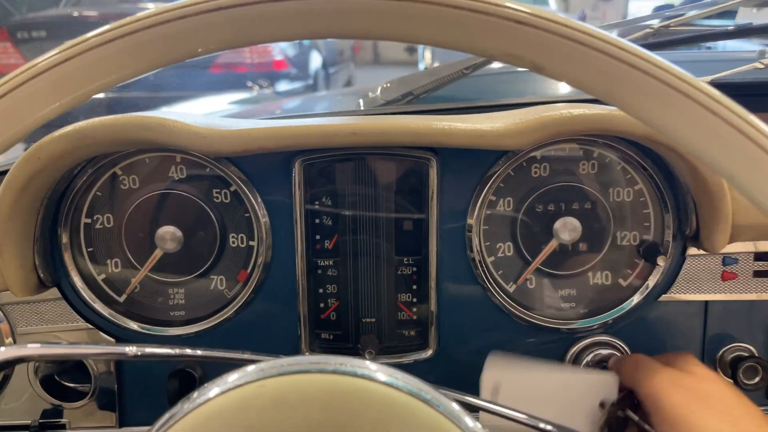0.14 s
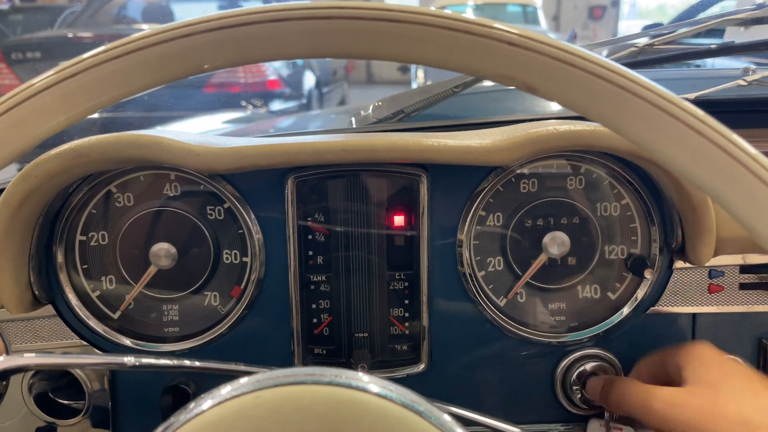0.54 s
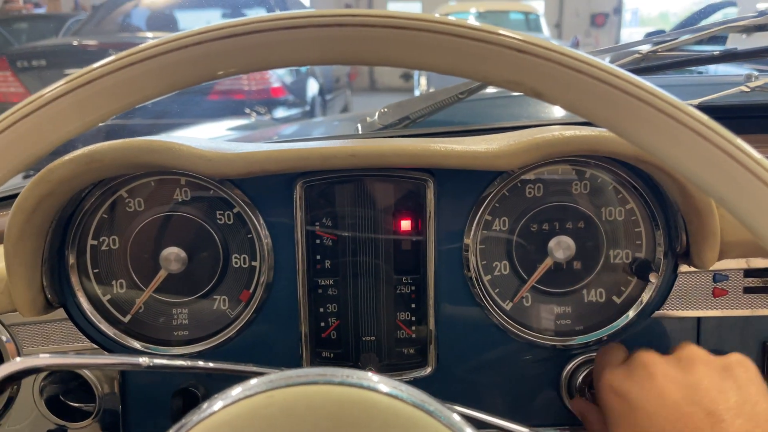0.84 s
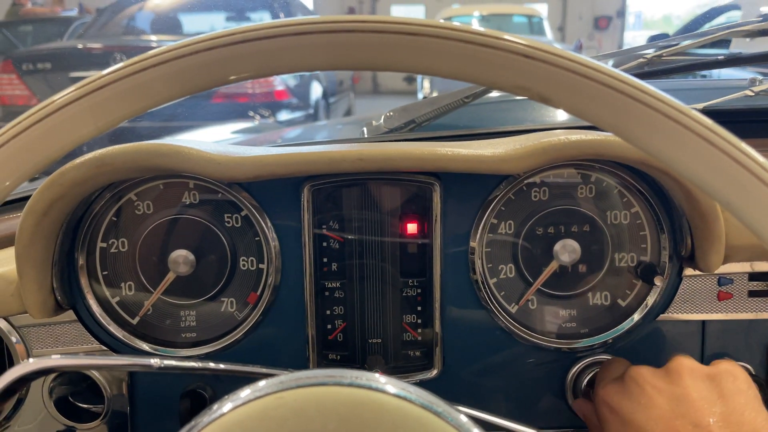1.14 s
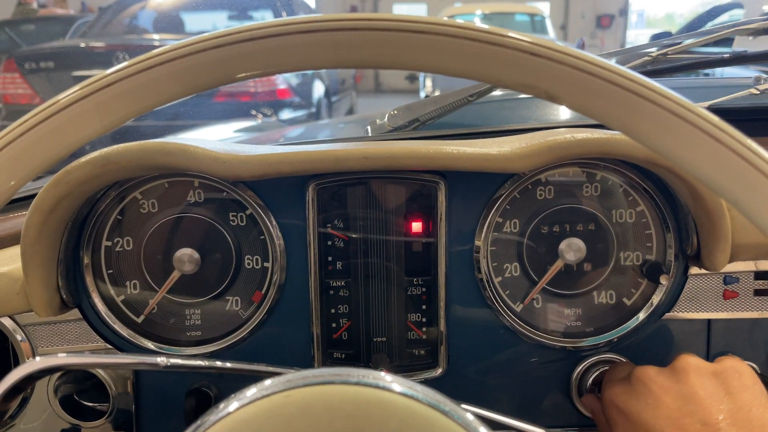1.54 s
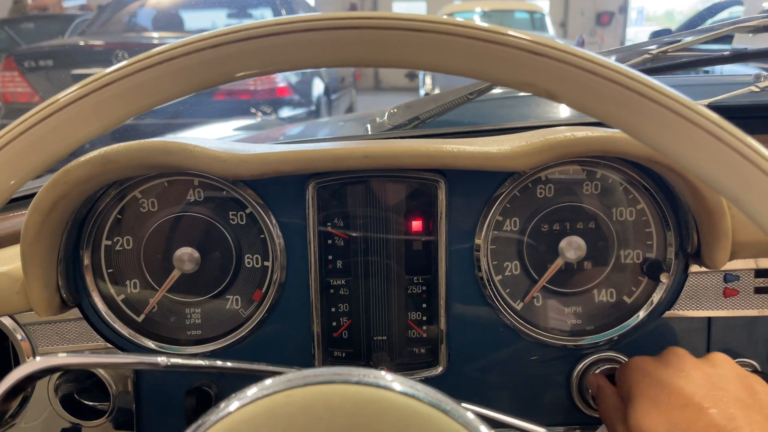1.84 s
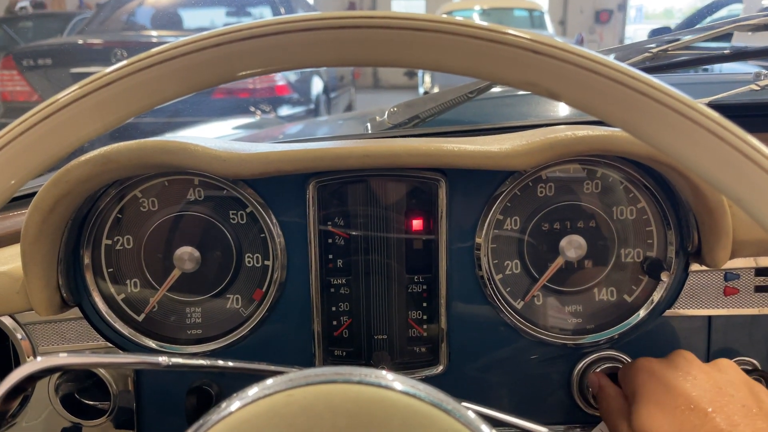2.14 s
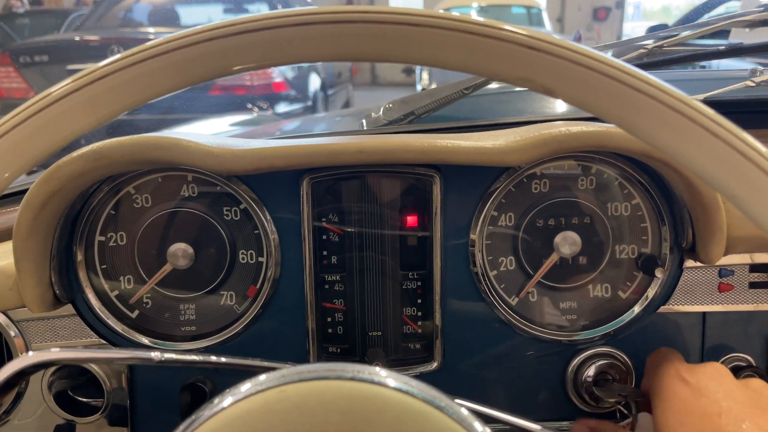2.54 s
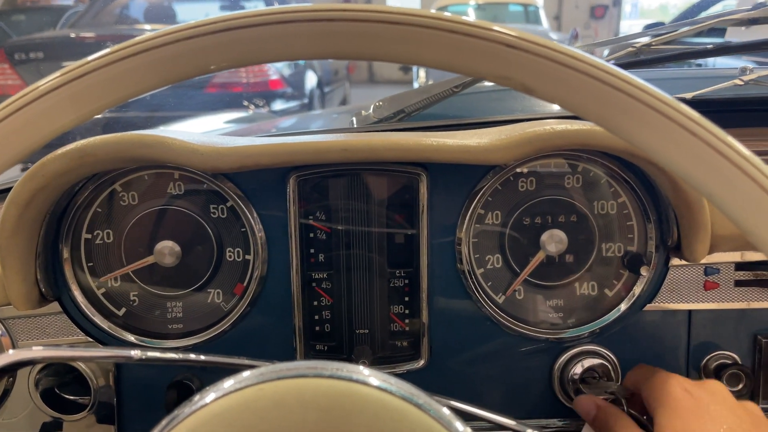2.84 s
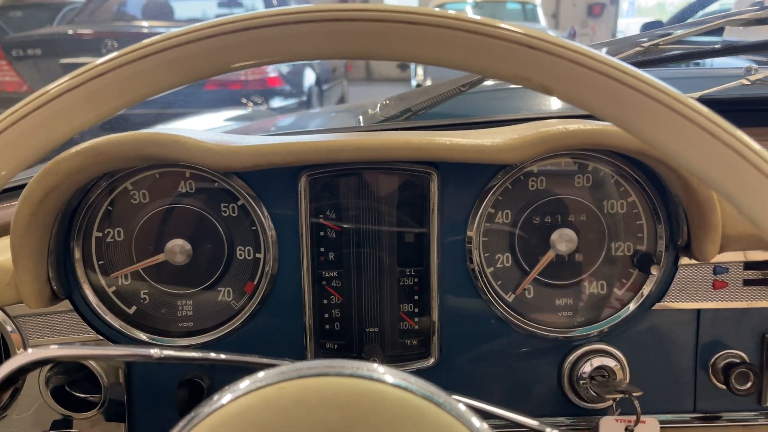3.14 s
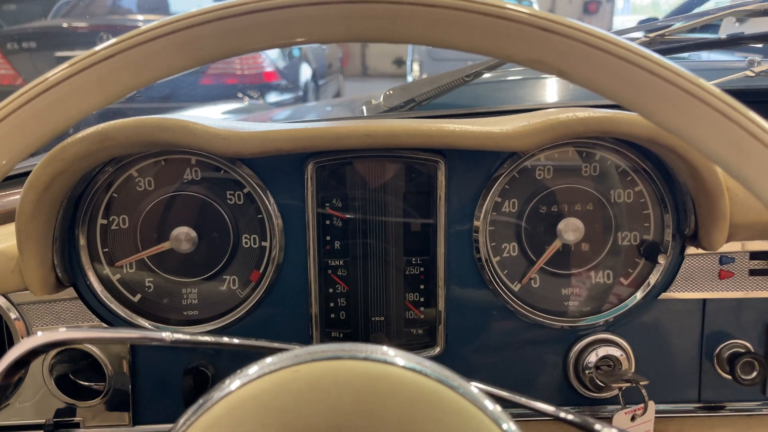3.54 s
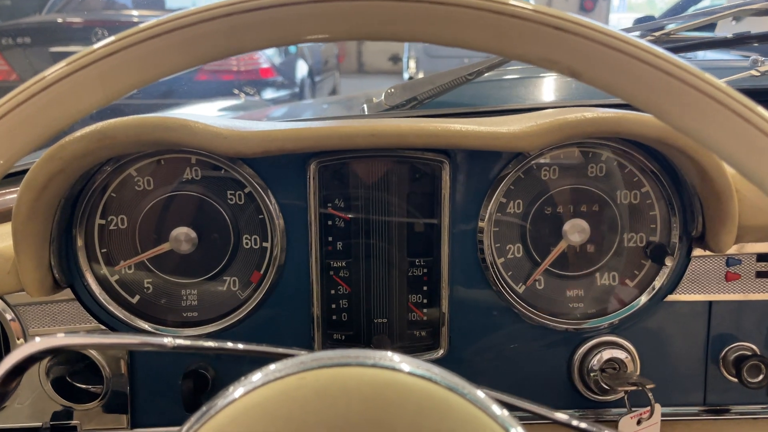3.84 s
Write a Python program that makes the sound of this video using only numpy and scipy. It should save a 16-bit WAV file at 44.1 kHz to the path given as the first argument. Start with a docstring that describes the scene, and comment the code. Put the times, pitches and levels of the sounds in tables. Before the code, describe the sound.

An old car engine is started, heard close inside the cabin in stereo, over faint hall air and distant low rumble. Keys jingle and click from 0.2 to 1 s; a very faint thin whine lasts until 1.9 s. The starter slams in and grinds, groaning. From 2.2 s the engine catches unevenly, thumps at 2.4 and 2.6, climbs to a booming rumble with soft clatter, easing slightly after 3.3 s. Keys clink near 3.2-3.3.

```python
"""Inside an old car in a hall: air noise and low traffic rumble (shaped noise) run throughout.
From 0.19 s the key ring jingles (decaying modes and lock knocks); from 0.92 to 1.88 s a fuel pump whines (narrow noise).
The starter scrapes in, slams home, grinds (noise, random tooth hits, resonances) and groans over compressions.
At 2.17 s the six-cylinder engine catches, speeds up and settles: firing orders boom through the cabin response,
with throb noise and puffing clatter; uneven firings and two thumps give way to thin whistles; late keys knock."""
import sys
import numpy as np
from scipy import signal
from scipy.fft import rfft, irfft, next_fast_len
from scipy.io import wavfile
from scipy.ndimage import map_coordinates

SR = 44100
rng = np.random.default_rng(int(sys.argv[2]) if len(sys.argv) > 2 else 0)


def amplitude_ratio(level_db):
    """Convert a level in decibels to the matching linear amplitude (field) ratio."""
    exponent = np.asarray(level_db, float) / 20
    return 10 ** exponent


def pcm_store(signal):
    """Save signal as 16-bit PCM."""
    levels = np.round(np.clip(np.atleast_2d(signal), -1, 1) * 32767)
    wavfile.write(sys.argv[1], SR, levels.astype(np.int16).T)


N = 176400


def unit(x):
    """Scaled to rms 1."""
    return x / np.sqrt(np.mean(x ** 2) + 1e-20)


def along(points, hz):
    """(hz, value) points interpolated on a log frequency axis."""
    point_hz, value = np.transpose(points)
    return np.interp(np.log(hz + 1), np.log(point_hz + 1), value)


def curve(rows):
    """(s, value) rows interpolated to one value per sample."""
    s, value = np.transpose(rows)
    return np.interp(np.arange(N) / SR, s, value)


def ramp(start_s, rise_s):
    """0 before the start, 1 after the rise."""
    return np.clip((np.arange(N) / SR - start_s) / rise_s, 0, 1)


def wobble(knots_per_s):
    """A smooth random curve through normal knots."""
    knots = rng.standard_normal(int(N * knots_per_s / SR) + 4)
    return map_coordinates(knots, [np.arange(N) * knots_per_s / SR])


def filtered(x, response):
    """x times a complex response of frequency."""
    size = next_fast_len(N + SR // 2)
    return irfft(rfft(x, size) * response(np.fft.rfftfreq(size, 1 / SR)), size)[..., :N]


def causal(points):
    """The minimum-phase response with the gain of (hz, dB) points, by folding the cepstrum."""
    def response(hz):
        cepstrum = irfft(np.log(amplitude_ratio(along(points, hz)) + 1e-6))
        cepstrum[1:len(hz) - 1] *= 2
        cepstrum[len(hz):] = 0
        return np.interp(hz, np.linspace(0, hz[-1], len(hz)), np.exp(rfft(cepstrum)))
    return response


# left-right likeness of noise: (hz, correlation)
ALIKE = [(60, 1), (150, 0.85), (360, 0.34), (1500, 0.23), (12400, 0.12)]


def rush(gain, source=None):
    """Stereo noise of rms 1, alike on both sides in the bass."""
    pair = rng.standard_normal((2, N)) if source is None else source

    def mid_side_gain(hz):
        angle = np.arccos(np.clip(along(ALIKE, hz), -1, 1)) / 2
        return gain(hz) * [np.cos(angle), np.sin(angle)]
    mid, side = filtered(pair, mid_side_gain)
    return unit(np.array([mid + side, mid - side]))


def colour(points):
    """The gain of (hz, dB) points."""
    return lambda hz: amplitude_ratio(along(points, hz))


def whistle(centre_hz, width_hz):
    """A fuzzy line: noise under a narrow resonance."""
    return rush(lambda hz: 1 / (1 + ((hz - centre_hz) / width_hz) ** 2))


# hall air level: (time_s, level_db)
AIR_LEVEL = [(0, -40), (.9, -41), (1.2, -43.5)]
# hall air spectrum: (freq_hz, relative_db_per_hz)
AIR = [(200, -13), (300, -18.5), (395, -3.5), (470, -10), (1030, -3), (1250, -9), (2300, -14),
       (4500, -27.5), (9300, -26.5), (11300, -28.5), (11800, -70)]


def hall_air():
    """Broad noise, falling in level and slightly unsteady."""
    return amplitude_ratio(curve(AIR_LEVEL) + 0.81 * wobble(5.9)) * rush(colour(AIR))


# distant traffic spectrum: (freq_hz, relative_db_per_hz)
RUMBLE = [(28, -24), (42, 3.5), (62, -4), (83, -4), (105, -22), (188, -13), (260, -29), (400, -62)]
RUMBLE_DB, RUMBLE_SWING_DB = -33.5, 1.5


def traffic_rumble():
    """Low noise that swells slowly."""
    return amplitude_ratio(RUMBLE_DB + RUMBLE_SWING_DB * wobble(2.98)) * rush(colour(RUMBLE))


# key ring contacts: (time_s, ring_db, ring_centre_hz, dull_clack_relative_db)
KEYS = [(0.1877, -15.5, 9580, -6), (0.1973, -30, 9900, 6.5), (0.2338, -32.5, 9500, -6),
        (0.574, -41, 8800, -4), (0.301, -28.5, 9400, -12), (0.3163, -25, 9300, -9.5),
        (0.4482, -32, 9000, -20), (0.4599, -20, 9300, -34), (0.4654, -28, 9000, -20),
        (0.5045, -13.5, 9120, -31), (0.527, -41.5, 7850, 5), (0.601, -31, 9000, -6),
        (0.6153, -24.5, 9250, -18), (0.6608, -28, 7600, -6), (0.6945, -23.5, 9640, -5),
        (0.723, -20.5, 9500, -8), (0.8215, -30.5, 9200, -22), (0.8487, -40, 10200, 0),
        (0.867, -26.5, 9300, -17), (0.8889, -28, 9600, -24), (0.9176, -21.5, 9860, -31),
        (0.9615, -25.5, 8900, -11.5), (1.3525, -39, 9800, -24), (1.818, -37, 9540, -3),
        (3.1993, -28, 8000, -9), (3.2782, -10.5, 8410, -18.5)]
# modes of the keys: (freq_hz, level_db, t60_s)
KEY_MODES = [(7915, -3.5, 0.12), (8410, 2, 0.042), (9000, 5.5, 0.016), (9360, -6, 0.033),
             (9940, 8.5, 0.024), (10200, 18, 0.04), (11010, 22.5, 0.021)]
# lock barrel and dash: (freq_hz, gain_db)
CLACK = [(100, -22), (250, 6), (1700, -1), (2260, 5), (3200, -0.5), (4500, -1.5), (7000, -1), (9500, -30)]
# stereo phase: (freq_hz, left_lead_rad)
KEY_LEAD = [(100, -1), (6000, 1.24), (9000, -0.93), (12500, -6.5)]
RING_SPREAD_HZ, RING_FAR_DB, MODE_SCATTER_DB = 450, -22.5, 3
CHATTER_S, CHATTER_DROP_DB = 0.0045, 3.3
CRACK_DB, CRACK_T60_S, CLACK_T60_S = -5, 0.0043, 0.084
ECHO_DB, ECHO_T60_S = -12, 0.09


def keys():
    """Each contact chatters three times, rings the modes near its centre most and knocks the lock."""
    ring, knock = np.zeros(N + SR), np.zeros(N + SR)
    t = np.arange(SR // 6) / SR
    mode_hz, mode_db, mode_t60_s = np.transpose(KEY_MODES)[:, :, None]
    for s, ring_db, centre_hz, clack_db in KEYS:
        share = amplitude_ratio(RING_FAR_DB) + np.exp(-.5 * ((mode_hz - centre_hz) / RING_SPREAD_HZ) ** 2)
        for k in range(3):
            scatter_db = MODE_SCATTER_DB * rng.standard_normal(mode_hz.shape)
            decay = share * amplitude_ratio(mode_db + scatter_db - 60 * t / mode_t60_s)
            modes = decay * np.sin(2 * np.pi * (mode_hz * t + rng.random(mode_hz.shape)))
            tone = modes.sum(0) / np.linalg.norm(share) * (1 - np.exp(-t / 0.0001))
            crack = amplitude_ratio(CRACK_DB - 60 * t / CRACK_T60_S) * np.diff(rng.standard_normal(len(t) + 1))
            at = round((s + k * CHATTER_S * (.5 + .5 * rng.random())) * SR)
            ring[at:at + len(t)] += amplitude_ratio(ring_db - CHATTER_DROP_DB * k) * (tone + crack)
        at = round(s * SR)
        clack = amplitude_ratio(ring_db + clack_db - 60 * t / CLACK_T60_S) * rng.standard_normal(len(t))
        knock[at:at + len(t)] += clack
    mono = ring[:N] + filtered(knock[:N], causal(CLACK))
    direct = filtered(mono, lambda hz: np.exp(.5j * along(KEY_LEAD, hz) * [[1], [-1]]))
    tail = rng.standard_normal((2, len(t))) * amplitude_ratio(-60 * t / ECHO_T60_S)
    echo = signal.fftconvolve(mono[None], tail / np.linalg.norm(tail[0]), axes=1)[:, :N]
    return direct + amplitude_ratio(ECHO_DB) * echo


PUMP_S, PUMP_STOP_S, PUMP_HZ, PUMP_DB, PUMP_WIDTH_HZ = 0.92, 1.88, 6440, -66.5, 27


def fuel_pump():
    """A faint fuzzy whine, switched on and off."""
    gate = ramp(PUMP_S, 0.05) * (1 - ramp(PUMP_STOP_S, 0.02))
    return amplitude_ratio(PUMP_DB) * gate * whistle(PUMP_HZ, PUMP_WIDTH_HZ)


# starter gear noise: (time_s, level_db)
GRIND = [(1.875, -46), (1.885, -31), (2.05, -32.5), (2.16, -38.5), (2.3, -33), (2.45, -32), (2.58, -29.5),
         (2.68, -38.5)]
# gear spectrum before the housing: (freq_hz, relative_db_per_hz)
GEARS = [(200, -13), (350, -3), (1010, -7), (8850, -12), (11800, -12), (12800, -62)]
# housing resonances: (centre_hz, width_hz, gain_db)
HOUSING = [(1020, 10, 3.5), (1376, 13, 8.8), (1902, 11, 11), (2320, 130, 6.2), (3310, 104, 7)]
TEETH_PER_S, TEETH_DB = 830, -8  # mean rate; level relative to the scrape
SLAM_S, SLAM_DB, SLAM_T60_S = 1.919, -21, 0.15  # pinion meets flywheel
GRIND_SWING_DB = 1.2


def starter_gears():
    """The pinion scrapes in and slams home; random tooth hits and noise excite the housing resonances."""
    t = np.arange(N) / SR
    teeth = (rng.random((2, N)) < TEETH_PER_S / SR) * rng.standard_normal((2, N))
    source = rng.standard_normal((2, N)) + amplitude_ratio(TEETH_DB) * unit(teeth)

    def gain(hz):
        rings = sum(amplitude_ratio(db) * width / (width + 2j * (hz - centre)) for centre, width, db in HOUSING)
        return amplitude_ratio(along(GEARS, hz)) * (1 + np.abs(rings))
    slam = amplitude_ratio(SLAM_DB - 60 * np.abs(t - SLAM_S) / SLAM_T60_S) * (t > SLAM_S)
    gate = (t > GRIND[0][0]) * (t < GRIND[-1][0])
    grind = amplitude_ratio(curve(GRIND) + GRIND_SWING_DB * wobble(29.93)) * gate
    return rush(gain, source) * (grind + slam)


# groans against compression: (start_s, level_db, mount_pitch_hz)
STROKES = [(1.912, -21, 236.7), (2.001, -28.5, 292), (2.055, -39, 196), (2.096, -29.5, 299),
           (2.159, -37, 248.6)]
# groan noise spectrum: (freq_hz, relative_db_per_hz)
GROAN = [(70, -39), (140, -2.5), (300, -4.5), (380, -13.5), (1100, -10.5), (1600, -51)]
STROKE_DECAY_S, SAG_HZ_PER_S = 0.063, 485  # decay to 1/e


def starter_groan():
    """The motor strains at each compression: low noise and a sagging tone of the mounts."""
    t = np.arange(N) / SR
    noise = rush(colour(GROAN))
    push = 0
    for s, db, pitch_hz in STROKES:
        since_s = t - s
        mounts = np.sin(2 * np.pi * (pitch_hz - .5 * SAG_HZ_PER_S * since_s) * since_s)
        swell = ramp(s, 0.008) * np.exp(-np.abs(since_s) / STROKE_DECAY_S)
        push = push + amplitude_ratio(db) * swell * (noise + mounts)
    return push


# firing orders: (multiple_of_firing_rate, level_db)
ORDER = [(1, -1), (1.5, -26), (2, -5), (2.5, -20), (3, -7), (3.5, -17), (4, -10)]
# cabin and exhaust response: (freq_hz, gain_db)
CABIN = [(34, -30), (39, -6), (44, -1), (64, 0), (78, -4), (87, -13), (100, -12), (107, -21), (116, -12),
         (130, -11), (158, -19), (175, -7), (203, -10), (218, -26), (232, -15), (300, -30)]
BOOM_DB, SHAKE_DB, UNEVEN_DB = -5.4, 0.25, 2.5  # shake per order; uneven: early scatter


def cabin_boom(turn, running, steady):
    """Firing orders excite the cabin, those above the first unevenly at the start."""
    orders = 0
    for k, db in ORDER:
        shake_db = SHAKE_DB * k * wobble(8.9)
        uneven_db = np.clip(k - 1, 0, 1) * UNEVEN_DB * wobble(24.95) * (1 - steady)
        phase = k * turn + 0.078 * k * wobble(11.0)
        orders = orders + amplitude_ratio(db + shake_db + uneven_db) * np.cos(phase)
    return amplitude_ratio(BOOM_DB) * filtered(orders * running, causal(CABIN))


# exhaust throb spectrum: (freq_hz, relative_db_per_hz)
THROB = [(45, -30), (70, -9.5), (102, -18.5), (193, -11.5), (450, -47)]
THROB_DB, THROB_SWING_DB = -32, 1.2


def throb():
    """Low flow noise of unsteady level."""
    return amplitude_ratio(THROB_DB + THROB_SWING_DB * wobble(9.5)) * rush(colour(THROB))


# valve gear, belts and intake: (freq_hz, relative_db_per_hz)
CLATTER = [(420, -5.5), (850, -12), (1020, -7), (1170, -15.5), (1320, -11), (1500, -13), (6500, -28.5),
           (7700, -17.5), (12300, -26.5), (13100, -70)]
CLATTER_DB, CLATTER_SWING_DB, PUFF_DEPTH = -35, 1.2, 0.27


def clatter(turn):
    """Broad mechanical noise that puffs once a firing, to a varying depth."""
    puff = 1 + PUFF_DEPTH * (1 + .5 * wobble(30)) * np.cos(turn)
    return amplitude_ratio(CLATTER_DB + CLATTER_SWING_DB * wobble(5.74)) * puff * rush(colour(CLATTER))


# odd hard firings: (time_s, level_db)
STUMBLES = [(2.421, -7.5), (2.579, -9.5)]
THUMP_HZ, THUMP_T60_S = 67, 0.33


def thumps():
    """Odd hard firings thump the cabin air: a decaying low sine each."""
    total = np.zeros(N)
    for s, db in STUMBLES:
        since_s = np.clip(np.arange(N) / SR - s, 0, None)
        total += amplitude_ratio(db - 60 * since_s / THUMP_T60_S) * np.sin(2 * np.pi * THUMP_HZ * since_s)
    return total


# thin whistles of the running engine: (centre_hz, level_db, width_hz)
WHISTLES = [(5630, -56, 15), (7440, -55, 61)]


def thin_whistles():
    """Faint narrow noise lines."""
    return sum(amplitude_ratio(db) * whistle(hz, width_hz) for hz, db, width_hz in WHISTLES)


# engine speed: (time_s, firings_per_s)
ENGINE = [(2.2, 25), (2.304, 29.5), (2.424, 37.1), (2.5, 40.5), (2.62, 46), (2.69, 51), (2.78, 53.3),
          (2.86, 57.4), (3, 57.4), (3.252, 59), (3.5, 54.8), (3.78, 50.6), (4, 49.5)]
CATCH_S, CATCH_RISE_S, STEADY_S, STEADY_RISE_S = 2.17, 0.15, 2.55, 0.16


def engine():
    """One firing phase drives boom and clatter; whistles come in as the firing evens out."""
    turn = 2 * np.pi * np.cumsum(curve(ENGINE)) / SR
    running = ramp(CATCH_S, CATCH_RISE_S) ** 2
    steady = ramp(STEADY_S, STEADY_RISE_S)
    noise = running * (throb() + clatter(turn))
    return cabin_boom(turn, running, steady) + noise + thumps() + steady * thin_whistles()


def scene():
    """Everything in the cabin."""
    hall = hall_air() + traffic_rumble()
    starter = starter_gears() + starter_groan()
    return hall + keys() + fuel_pump() + starter + engine()


def low_pass(x):
    """Removes everything above the highest recorded frequency."""
    return signal.sosfilt(signal.butter(12, 16200, fs=SR, output="sos"), x)


# microphone balance: (freq_hz, left_over_right_db)
LEFT = [(130, 0), (250, -1.4), (1000, 2.2), (4000, 2.3), (9000, .3)]
TREBLE_HZ = 12600


def record(dry):
    """Two microphones: unequal by frequency, with a fade at the top."""
    def response(hz):
        fade = 1 / (1 + (hz / TREBLE_HZ) ** 10)
        return fade * amplitude_ratio(along(LEFT, hz) * [[.5], [-.5]])
    return low_pass(filtered(dry, response))


dry = scene()
out = record(dry)
pcm_store(out)
```